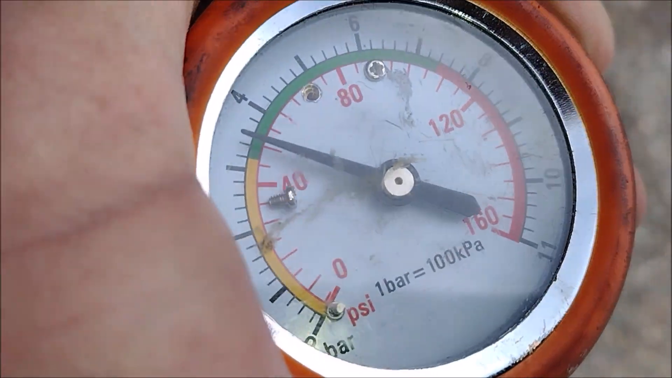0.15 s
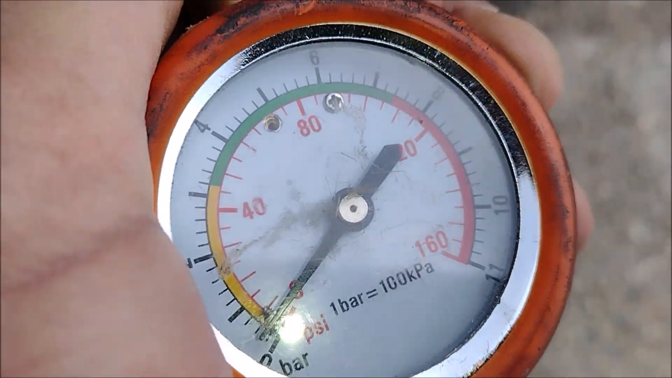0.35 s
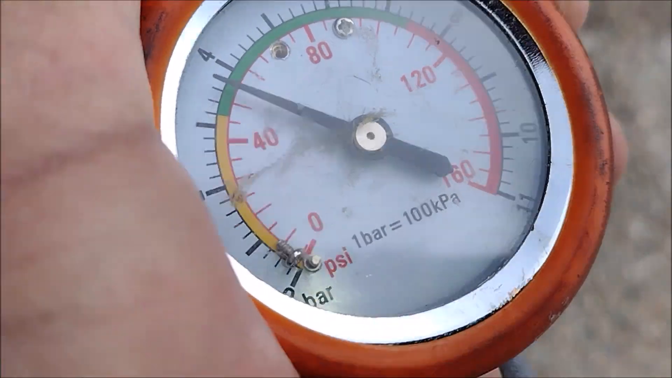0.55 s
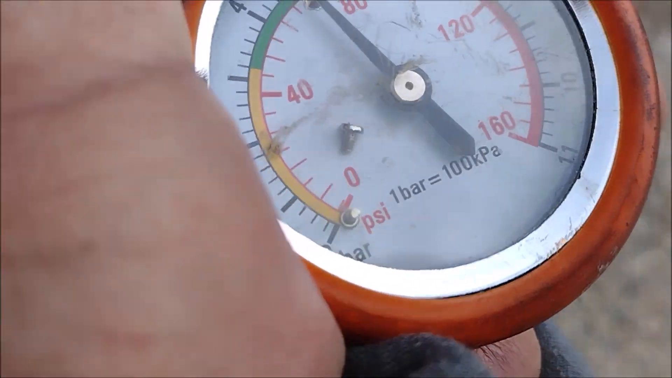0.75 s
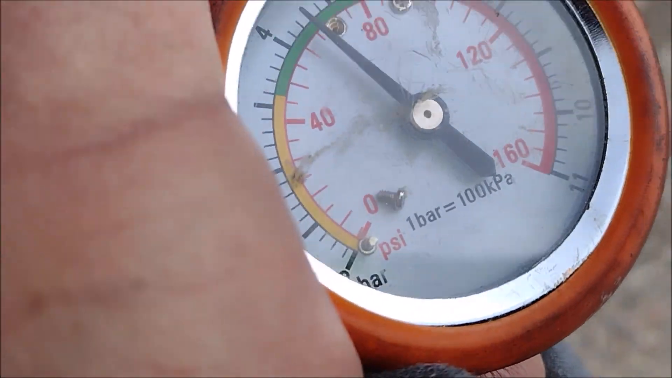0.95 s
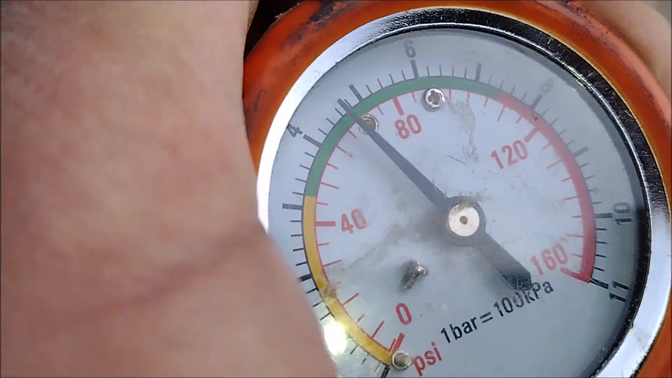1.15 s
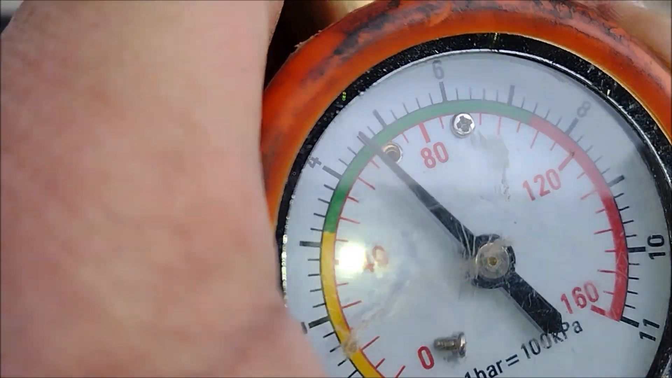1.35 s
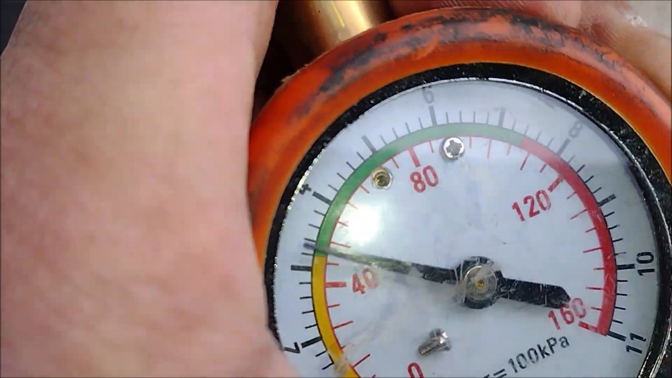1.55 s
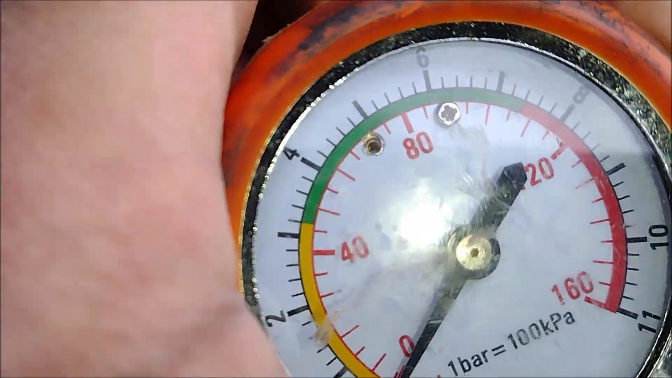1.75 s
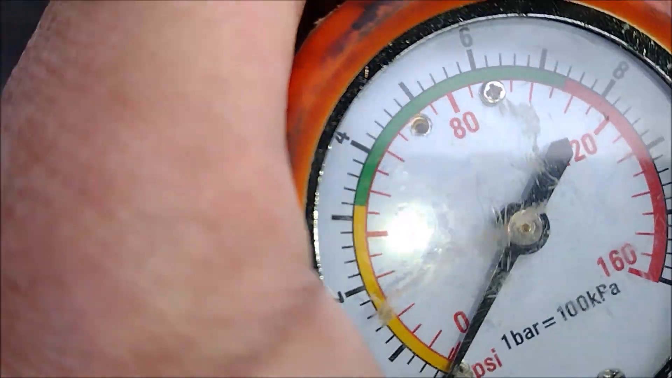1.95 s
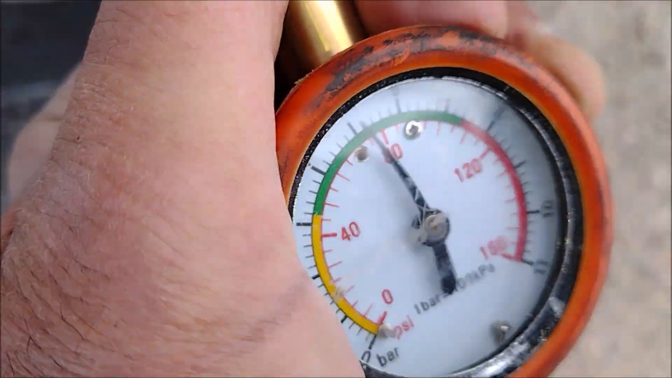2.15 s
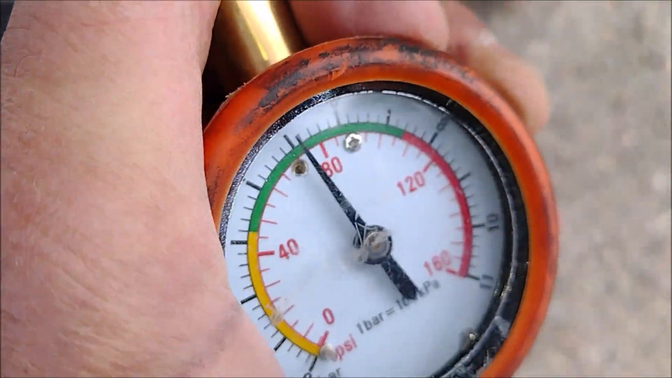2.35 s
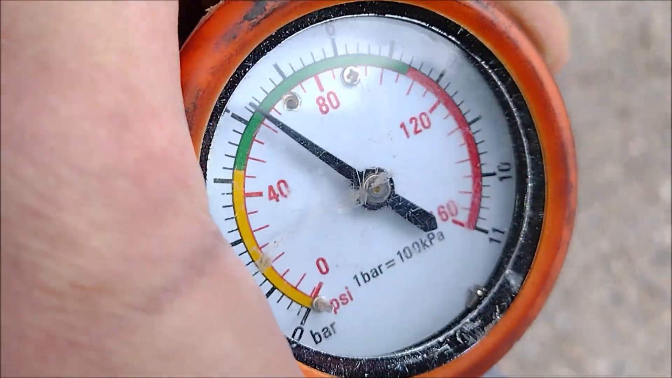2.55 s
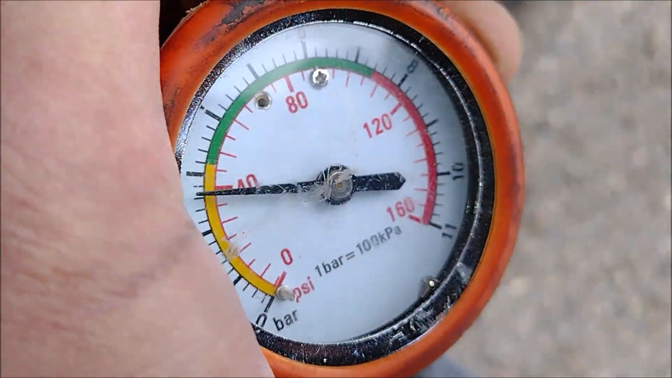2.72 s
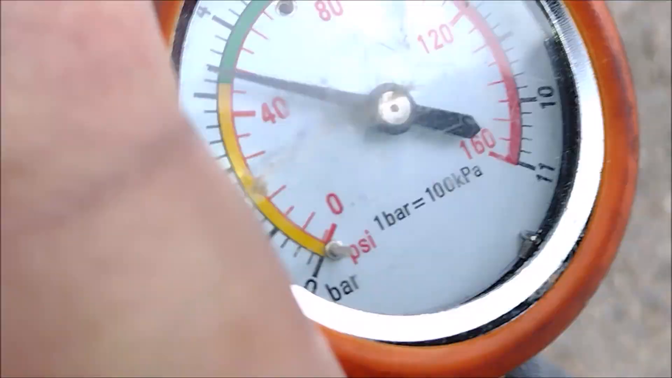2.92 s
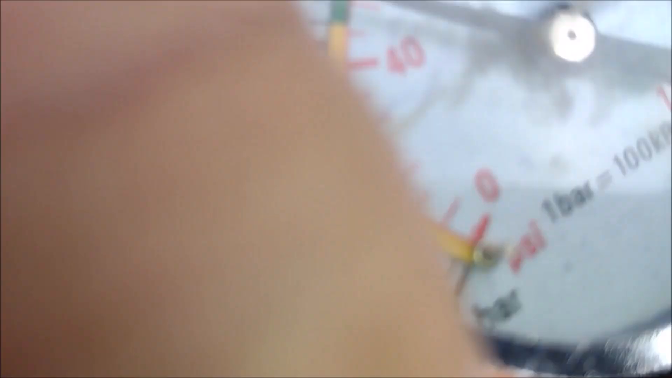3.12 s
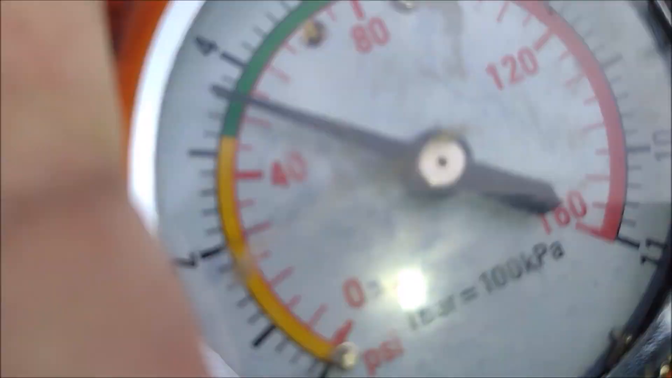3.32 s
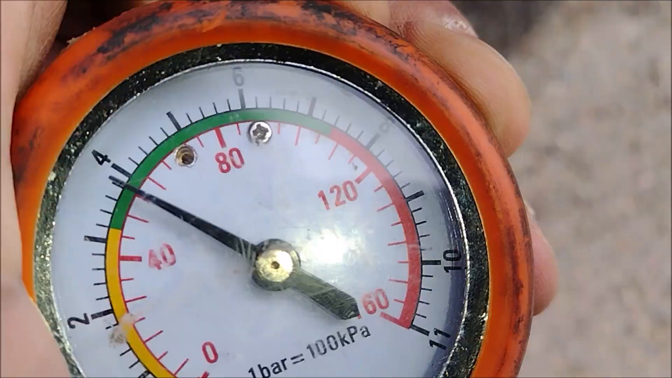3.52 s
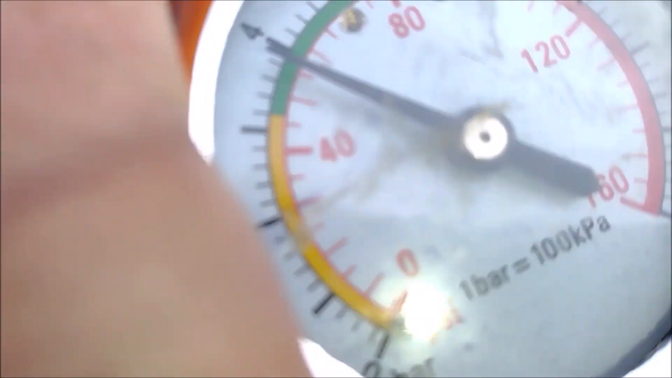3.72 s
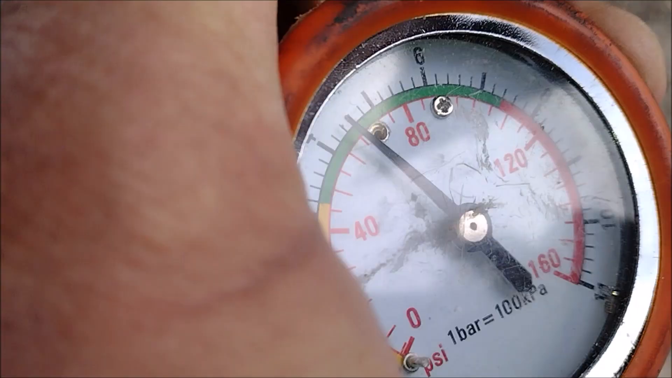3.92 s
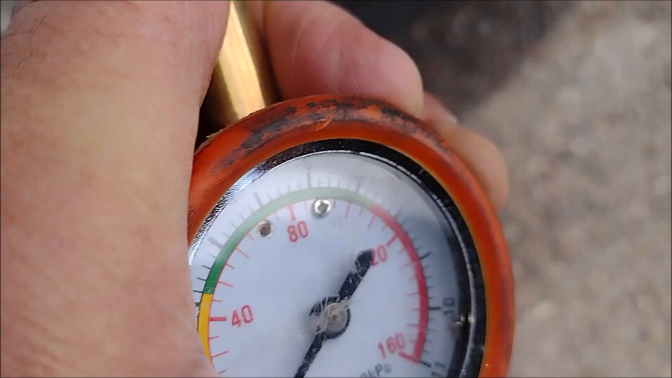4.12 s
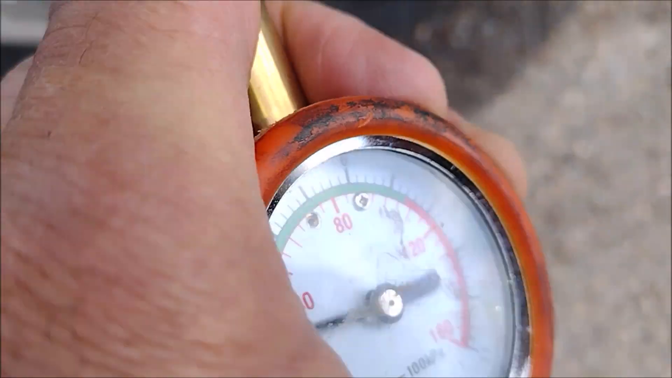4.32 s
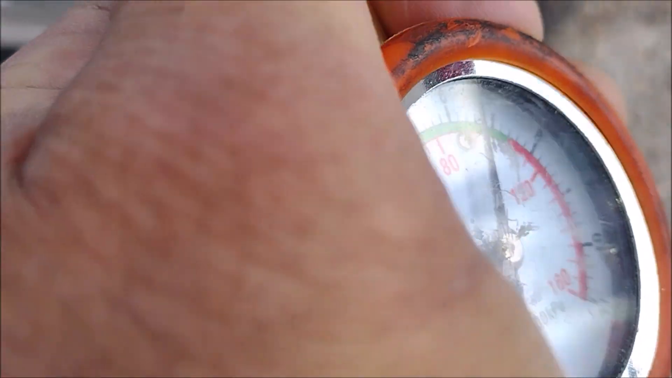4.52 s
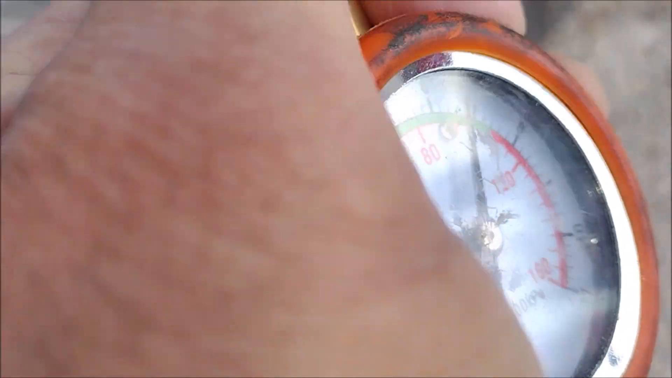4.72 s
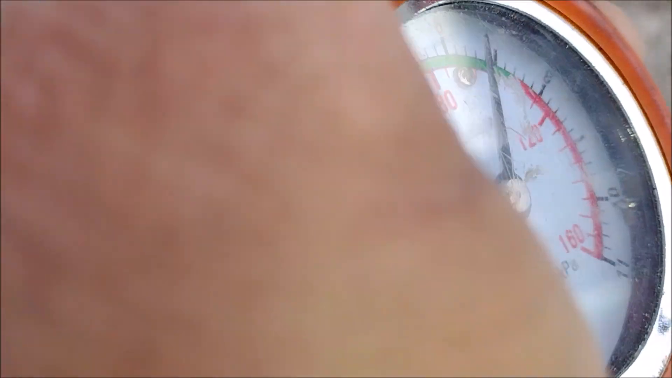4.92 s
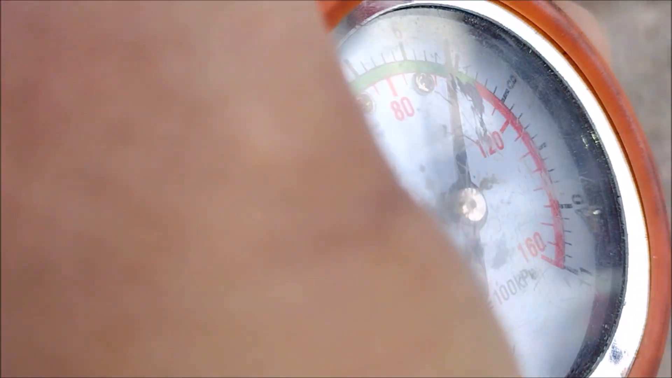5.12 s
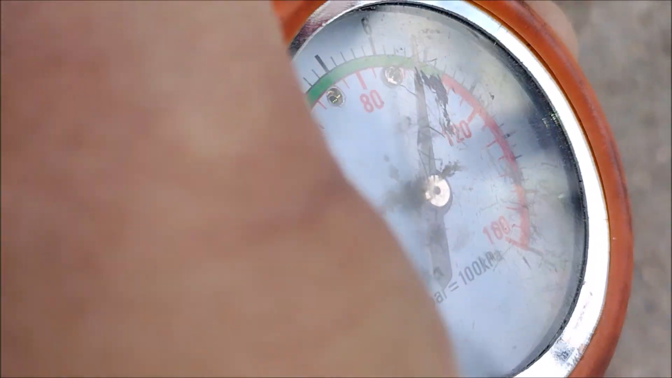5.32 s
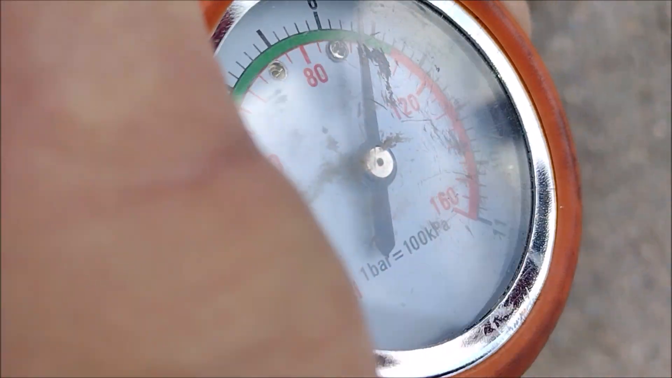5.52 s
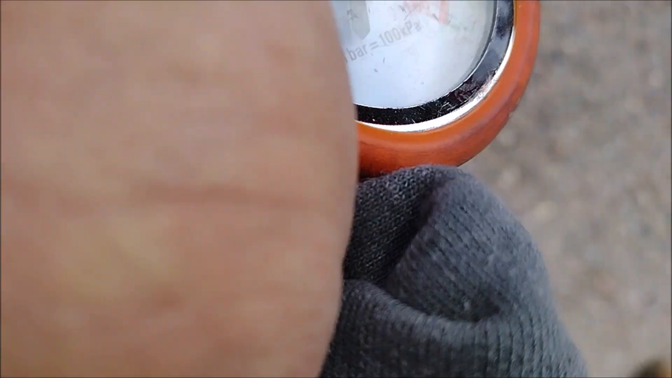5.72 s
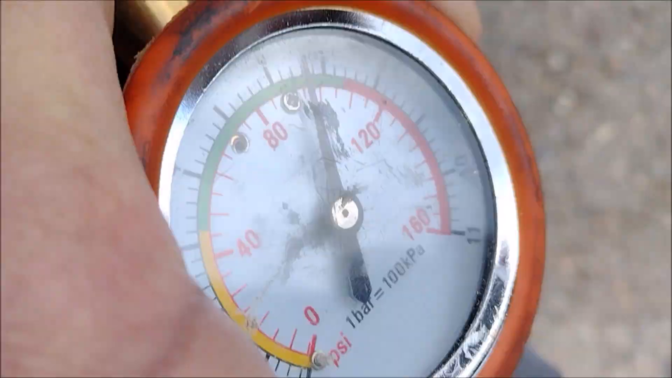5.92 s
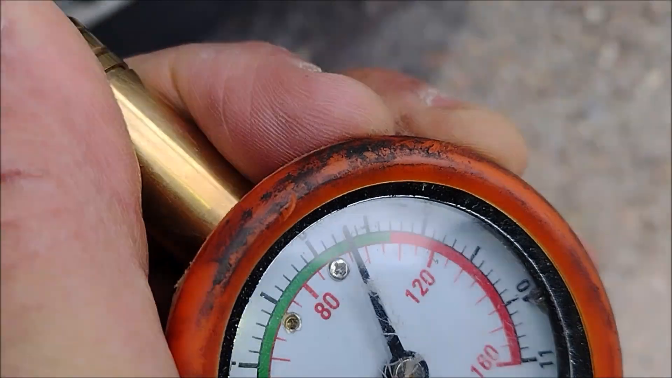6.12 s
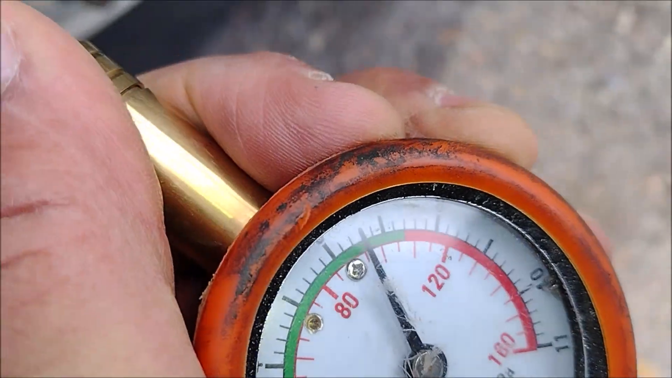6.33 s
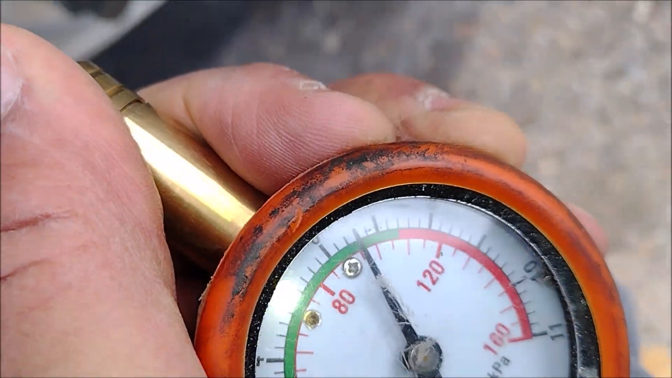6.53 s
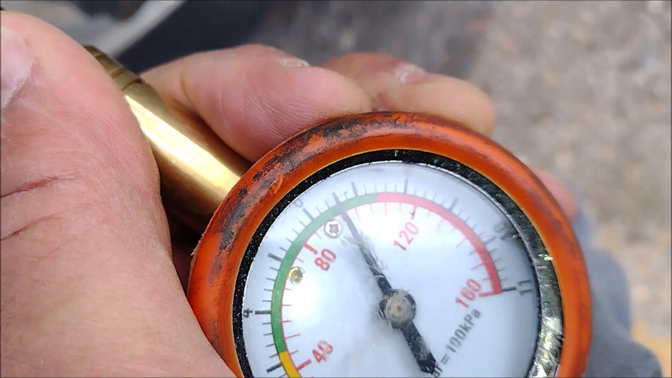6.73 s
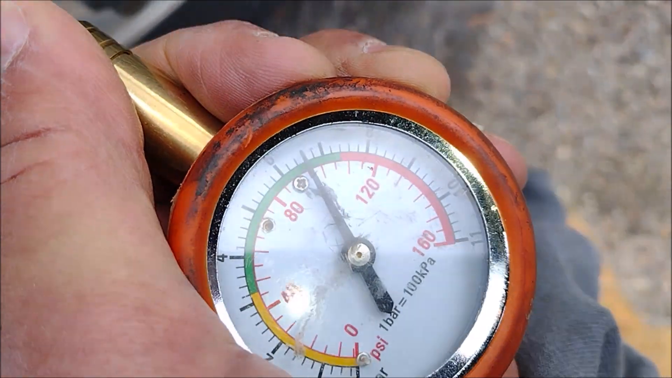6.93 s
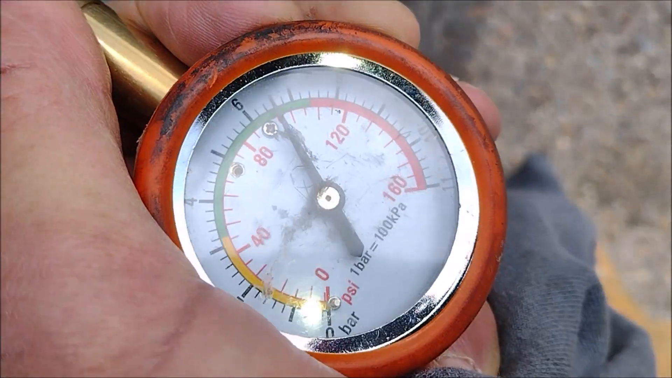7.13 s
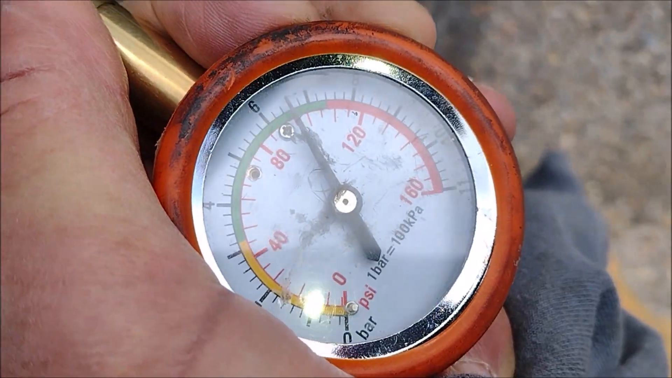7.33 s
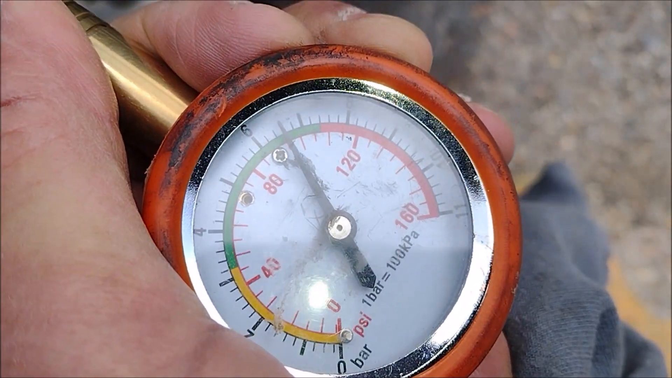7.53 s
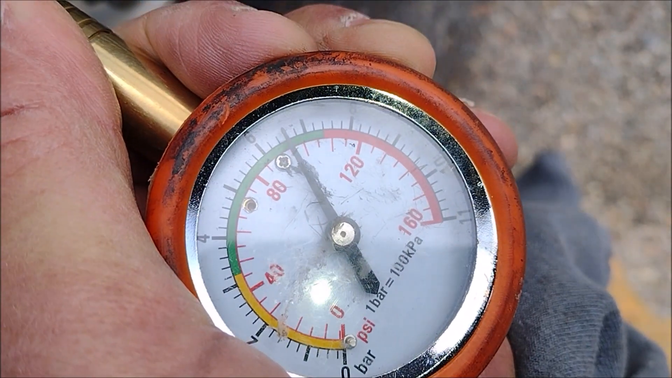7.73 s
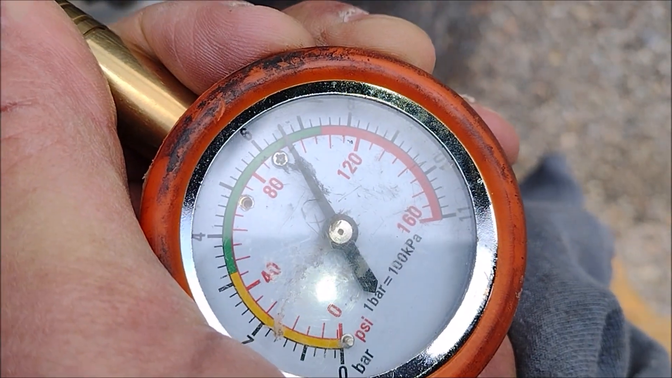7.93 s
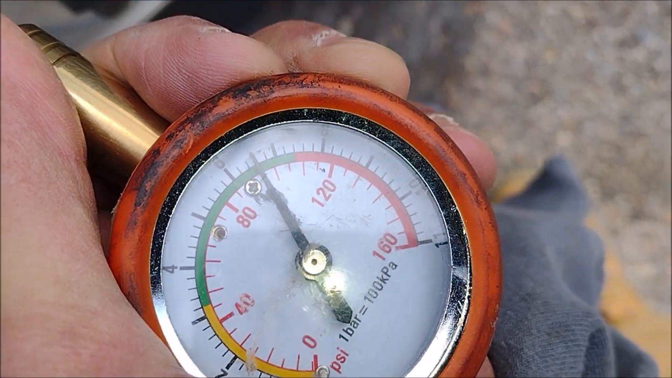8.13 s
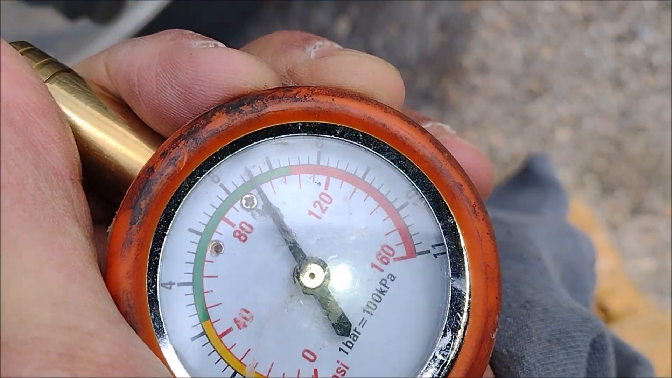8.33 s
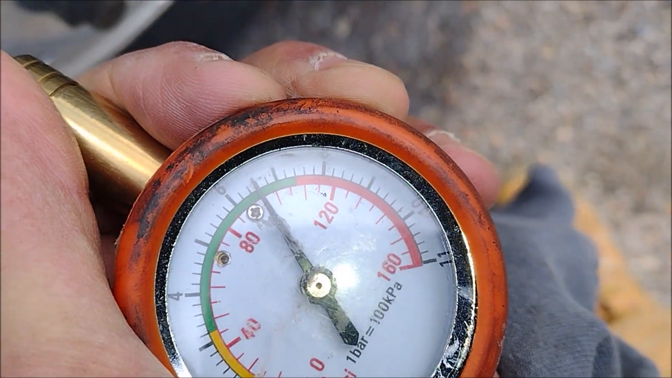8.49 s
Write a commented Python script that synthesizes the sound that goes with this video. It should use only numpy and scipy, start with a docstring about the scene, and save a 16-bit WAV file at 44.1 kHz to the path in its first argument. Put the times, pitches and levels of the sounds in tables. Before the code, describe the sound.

Outdoors and very close to the microphone, compressed air escapes from a loose chuck held on a large tyre valve. Four roaring bursts start suddenly and cut off sharply, separated by short pauses with wind rumble and a small metallic tick. The longest burst carries a faint airy whistle and brief dips. Then the chuck seats and only a thin, bright, much quieter hiss continues, over a faint yard murmur.

```python
"""Compressed air roars in four bursts past a loose chuck held on a large tyre valve, close to a two-port microphone.
The jet is wide stereo noise, gated, shaded band by band and joined by a whistle near 2 kHz.
Then the chuck seats, and a thin hiss of noise with gliding echoes fills the tyre.
Struck modes make the metal ticks, and a short band of noise the rustle of the hand.
Low lumpy noise is wind on the ports, and a smooth coloured noise is the yard behind."""
import sys
import numpy as np
from scipy import signal
from scipy.fft import rfft, irfft, next_fast_len
from scipy.io import wavfile
from scipy.ndimage import map_coordinates

SR = 44100
rng = np.random.default_rng(int(sys.argv[2]) if len(sys.argv) > 2 else 0)


def pcm_store(signal):
    """Save signal as 16-bit PCM."""
    levels = np.round(np.clip(np.atleast_2d(signal), -1, 1) * 32767)
    wavfile.write(sys.argv[1], SR, levels.astype(np.int16).T)


def attenuation_scalar(level_db):
    """Turn a level in dB into a linear amplitude multiplier (20 dB per decade)."""
    decades = np.asarray(level_db, float) / 20
    return 10 ** decades


N = 377496   # length in samples
PORT_LAG_S = 0.000284   # the right port hears the valve later
SEATED_S = 4.47   # the chuck starts to seat

# The jet while it blows. Each row: time in seconds, level in dB, roar under 1.2 kHz in dB,
# 2 kHz rush in dB; roar and rush are weighted from band to band.
JET = [(0, -20.5, 2, 1.5), (.05, -15.5, 5, -0.5), (.16, -16.5, -3.5, -4.5), (.385, -17, -0.5, -4),
       (.7, -20, 2.5, 1.5), (1.05, -17, 0, -1), (1.7, -17.5, 1.5, 0), (2.15, -17, -3, 6),
       (2.42, -16, -1.5, 2), (2.6, -16.5, 0.5, 0.5), (3.09, -14.5, -0.4, 1.5), (3.2, -13.5, -4, -7.5),
       (3.45, -16, -3.5, -5), (3.66, -17.5, 1, 5), (3.8, -19, 2.5, 1.5), (3.86, -18, -1, -6.5),
       (3.96, -18.5, -1, -3.5), (4.08, -17.5, -2, 6.5), (4.19, -18.5, 0.5, -3.5), (4.45, -19.5, -2, 2.5)]
# Bursts of the loose chuck. Each row: opening in seconds, shutting in seconds,
# slowness of the opening, slowness of the shutting (factors on the times of the next two tables).
BURSTS = [(-.3, 0.382, 1.01, 0.86), (0.599, 1.696, 0.9, 0.91), (2.131, 4.229, 1.08, 1.45),
          (4.375, 4.483, 0.61, 1.3)]
# Every opening creeps in, snaps, then swells, roar first.
# Each row: time from the opening in seconds (before slowness), level in dB, roar in dB.
OPENING = [(-.07, -77, 10), (-.035, -42, 6), (-.012, -22.5, -2), (-.004, -14.5, 5), (0, -5, 9.5),
           (.03, -2.5, 3), (.15, 0, 0)]
# Every shutting drops at once and leaves a dull tail.
# Each row: time from the shutting in seconds (before slowness), level in dB, low bands in dB.
SHUTTING = [(0, 0, 0), (.018, -12.5, 3.5), (.045, -43.5, 5.5), (.13, -49, 12), (.33, -59.5, 6)]
# The jet surges briefly, sometimes just before it half seals or shuts.
# Each row: peak in seconds, lift in dB, rise in seconds.
SURGES = [(2.237, 3, 0.082), (3.622, 2.5, 0.01), (3.79, 3, 0.024), (4.003, 5.5, 0.033), (4.222, 9, 0.038),
          (4.459, 8, 0.081)]
# The chuck half seals for a moment. Each row: time in seconds, level change in dB,
# further change of the low bands in dB (before each band's share), length in seconds.
SEALS = [(2.249, -6, -8.5, .15), (3.14, -6, 2, 0.085), (3.734, -6, -5.5, 0.055)]
# Colour of the jet. Each row: frequency in Hz, left in dB per Hz, right in dB per Hz, all relative.
ESCAPE_COLOUR = [(296, -30.5, -8.5), (413, -10.5, -12), (477, -5, -0.75), (820, -9.5, -3.5),
                 (1290, -6, -0.5), (2080, -13, -1.5), (2670, -8, -5.5), (4270, -9, -6.5),
                 (5600, -7.5, -4.5), (8040, -5.5, -4.5), (8610, -12, -15.5), (9980, -16, -20.5),
                 (13300, -11, -20), (17500, -10.5, -19.5)]
# Jet noise shared by the ports. Each row: frequency in Hz, common share of the power from 0 to 1.
ESCAPE_LIKENESS = [(500, 0.97), (1500, 0.79), (3500, 0.58), (7000, 0.36), (9000, 0.13)]
# Chuck, hose and port resonances. Each row: centre in Hz, width in Hz, left gain in dB, right gain in dB.
PIPE = [(528, 47, 5, 3.5), (670, 31, 6.5, 5), (948, 28, 9.5, 3), (1458, 24, -15, 4),
        (1805, 190, -0.5, -2.5), (2190, 250, 2, 2), (3720, 67, 1.2, 0), (4430, 240, 3.5, 3.5),
        (15300, 1200, 5.5, 7.5)]
# Whistle in the jet. Each row: time in seconds, level against the jet in dB at the right port.
WHISTLE = [(1.1, -28), (1.4, -16), (2.35, -16), (2.45, -8), (3.1, -7), (3.2, -22), (3.65, -14)]
# Stream of the seated chuck. Each row: time in seconds, level in dB, level around 11 kHz in dB,
# level above 14 kHz in dB (before each port's share), left minus right in dB.
FILL = [(4.5, -23.5, 5, 4, -1), (4.55, -25, 7, 7.5, -4.5), (4.6, -21.5, 8, 1.5, 2.5),
        (4.67, -27, 10.5, 1.5, 1.5), (4.8, -24.5, 10, -2, 7), (5.2, -29.5, 7, -3, 5),
        (5.45, -30.5, 2.5, -11, 11), (5.88, -35.5, -0.5, -6, 9), (6.1, -29.5, -5, 3.5, 12.5),
        (6.45, -29, -10, 5.5, 19), (7.05, -35.5, -3, 8, 20), (7.4, -30, -5.5, 5.5, 19.5),
        (8, -27.5, -8.5, 5.5, 18), (8.56, -27.5, -6.5, 6, 18)]
# The 4 kHz leak fades as the seal settles. Each row: time in seconds, level in dB.
LEAK = [(4.47, 12), (5.5, 11.5), (6.5, 2.5), (7.5, -5.5)]
# The seated stream spits. Each row: peak in seconds, lift in dB.
SPITS = [(4.858, 3.8), (4.89, 6.4), (4.916, 5)]
# Colour of the seated stream. Each row: frequency in Hz, left in dB per Hz, right in dB per Hz, all relative.
FILL_COLOUR = [(1515, -31, -28), (2450, -18.5, -30), (2980, -6.5, -19), (3670, -21.5, -26.5),
               (5200, -24, -20.5), (6050, -8, -23.5), (6570, 0.5, -8), (7860, 3.5, -16.5),
               (8930, -9, -18.5), (10200, -5.5, -34), (12100, -4.5, -37.5), (14000, -6.5, -26),
               (15950, -6.5, -24.5)]
# Stream noise shared by the ports. Each row: frequency in Hz, common share of the power from 0 to 1.
FILL_LIKENESS = [(1500, 0.37), (2800, 0.24), (4500, 0.21), (6500, 0.26), (12000, 0.43), (15000, 0.3)]
# Echoes off rim and hand, for the left then the right port, the first grip then the second.
# Each row: delay in milliseconds (before the left port's stretch), signed gain.
RIM_ECHOES = [
    [[(.807, -.17), (.953, .28), (1.189, .17), (1.325, -.16)], [(.923, -.23), (1.055, .12), (1.167, -.22),
     (1.347, -.12)]],
    [[(.638, -.14), (1.332, .18), (2.931, -.1)], [(1.385, .11), (1.554, .27), (1.982, -.13), (2.161, -.15)]],
]
# Hand movement. Each row: time in seconds, stretch of the left echo paths in the first grip, in the second.
HAND = [(4.93, 1, 1.07), (5.2, 1.032, 1.07), (5.85, 1.015, 1.068), (6.27, 1.015, 1.005), (6.6, 1.015, .988),
        (7.05, 1.015, .987), (7.25, 1.015, 1.003)]
# Metal chuck touching the valve. Each row: time in seconds, strength in dB before the mode levels.
TICKS = [(1.7724, -47.5), (1.82, -33.5)]
# Ringing modes of the chuck. Each row: frequency in Hz, relative level in dB, decay by 60 dB in seconds.
CHUCK = [(2955, -7.5, 0.22), (4910, -5, 0.012), (7784, -7, .03), (13400, -6, .02)]
# The hand shifts on the hose. The one row: peak in seconds, level in dB, half length in seconds.
RUSTLE = (1.998, -46, .035)
# Wind gusts. Each row: peak in seconds, peak level in dB, left minus right in dB, level around 250 Hz in dB.
GUSTS = [(.24, -28.5, -18.5, -2), (.51, -28, 11.5, 1.5), (1.17, -34, -16.5, -2), (2.07, -25, 1, -5),
         (2.16, -26, -16, -3.5), (3.45, -39, 4, 9), (4.06, -31, -5, -1), (4.3, -32.5, -20, -5.5)]
# Slowly changing draught between the gusts. Each row: time in seconds, level in dB.
BREEZE = [(0, -42.5), (1.5, -41), (1.95, -31.5), (2.5, -39), (3.3, -33), (4.4, -36.5), (5.0, -43),
          (5.8, -47.5), (7.1, -49.5), (8.56, -47)]
# Colour of the wind. Each row: frequency in Hz, left in dB per Hz, right in dB per Hz, all relative.
GUST_COLOUR = [(23.1, -30, -37), (50, -11, -13.5), (75.5, -6, 0), (108, 1, 2.5), (161, -2, -5.5),
               (228.6, -5, -6), (306, -14.5, -17), (444, -21.5, -23), (696, -60, -66.5), (2800, -87.5, -85)]
# Murmur of the yard. Each row: time in seconds, level in dB.
YARD = [(0, -49), (.5, -53), (1.9, -51.5), (4.3, -47.5), (6, -56), (7.3, -61.5), (8.56, -56)]
# Colour of the yard. Each row: frequency in Hz, left in dB per Hz, right in dB per Hz, all relative.
YARD_COLOUR = [(340, -26, -14.5), (480, -20, -20.5), (597, -15.5, -12), (730, -19, -19.5),
               (1340, -24.5, -23.5), (2000, -30, -21.5), (2820, -38.5, -28), (3500, -44, -37),
               (8100, -49, -56), (15700, -56, -58)]


def escape():
    """A wide jet in bursts; a larger gap lifts the roar and rush, while the top stays nearly steady."""
    level_db, roar_db, rush_db = in_time(JET)
    gate_db, gate_roar_db, gate_rush_db = valve()
    surge_db = sum(db * tent(s, rise_s, 0.018) for s, db, rise_s in SURGES)
    seal_db, seal_low_db = sealing()
    level_db = level_db + gate_db + surge_db + seal_db
    roar_db = roar_db + gate_roar_db + 0.81 * seal_low_db
    rush_db = rush_db + gate_rush_db + 0.51 * surge_db
    # above a knee of -22.5 dB the top ignores 99 % of the jet's swings
    top_db = -0.99 * (np.maximum(level_db, -22.5) + 17.5)
    shading = [(500, roar_db),
               (820, roar_db + 0.2 * rush_db),
               (1500, 0.44 * roar_db + 0.92 * rush_db + seal_low_db),
               (2300, 0.88 * rush_db + 1.24 * seal_low_db),
               (3200, 0.67 * rush_db + 0.2 * seal_low_db),
               (6000, 0.002),
               (11000, top_db)]
    jet = turbulence(ESCAPE_COLOUR, ESCAPE_LIKENESS, PORT_LAG_S, 0.93, 15.3, shading, pipe_ring, count=13)
    return attenuation_scalar(level_db) * (jet + whistle())


def valve():
    """The gap's level, roar and low-band dB, taken from the loudest burst at each moment."""
    bursts = []
    for on, off, slow_on, slow_off in BURSTS:
        opening = np.multiply(OPENING, [slow_on, 1, 1]) + [on, 0, 0]
        shutting = np.multiply(SHUTTING, [slow_off, 1, 1]) + [off, 0, 0]
        bursts.append([*in_time(opening), *in_time(shutting)])
    bursts = np.array(bursts)
    loudest = np.argmax(bursts[:, 0] + bursts[:, 2], axis=0)
    open_db, roar_db, shut_db, low_db = np.take_along_axis(bursts, loudest[None, None], axis=0)[0]
    return open_db + shut_db, roar_db + low_db, low_db


def sealing():
    """Level change while the chuck half seals, and the longer change of the low bands."""
    t, fall_s, hold_share = np.arange(N) / SR, 0.012, 0.64
    level_db, low_db = np.zeros(N), np.zeros(N)
    for s, db, further_db, length_s in SEALS:
        level_db += db * tent(s, fall_s, length_s)
        corners = [s - fall_s, s, s + hold_share * length_s, s + length_s]
        low_db += np.interp(t, corners, [0, further_db, further_db, 0])
    return level_db, low_db


def pipe_ring(hz):
    """Resonances raise or lower the noise around their centres, differently at each port."""
    gain_db = 0
    for centre, width, left_db, right_db in PIPE:
        peak = 1 / (1 + ((hz - centre) / (width / 2)) ** 2)
        gain_db = gain_db + np.array([[left_db], [right_db]]) * peak
    return attenuation_scalar(gain_db)


def whistle():
    """Noise twice through one narrow resonance, louder and later at the right port."""
    centre_hz, width_hz, left_db = 1955, 100, -10
    r = np.exp(-np.pi * width_hz / SR)
    poles = [1, -2 * r * np.cos(2 * np.pi * centre_hz / SR), r * r]
    tone = rng.standard_normal(N)
    for _ in range(2):
        tone = signal.lfilter([1, 0, -1], poles, tone)
    tone = rms_one(tone) * attenuation_scalar(in_time(WHISTLE)[0])
    return np.array([attenuation_scalar(left_db) * tone, np.roll(tone, round(PORT_LAG_S * SR))])


def fill():
    """A narrow stream into the tyre; its colour table holds where the left is 13 dB louder."""
    seating_s, colour_pan_db, spit_s = 0.03, 13, 0.0015
    level_db, top_db, edge_db, pan_db = in_time(FILL)
    leak_db = in_time(LEAK)[0]
    level_db = level_db + sum(db * tent(s, spit_s, spit_s) for s, db in SPITS)
    # how far the left and right ports follow the swings of the treble
    top_db = np.outer([1, 1], top_db)
    edge_db = np.outer([1, 0.13], edge_db)
    shading = [(2000, 0.68 * leak_db), (3000, 0.7 * leak_db), (4400, leak_db), (7000, 0),
               (11600, top_db), (15500, edge_db)]
    stream = turbulence(FILL_COLOUR, FILL_LIKENESS, 1.205 * PORT_LAG_S, 0.65, 13, shading, count=9)
    stream = rim_comb(stream)
    stream[1] *= attenuation_scalar(colour_pan_db - pan_db)
    seated = np.clip((np.arange(N) / SR - SEATED_S) / seating_s, 0, 1)
    return attenuation_scalar(level_db) * seated * stream / np.sqrt(1 + attenuation_scalar(-2 * pan_db))


def rim_comb(x):
    """Short echoes ripple the spectrum; at the left they glide as the hand moves, at both they change with its grip."""
    regrip_s, regrip_length_s = (5.6, 6.5), 0.3   # the second grip takes over, left and right
    fine = 4   # oversampling for fractional delays
    t, out = np.arange(N) / SR, x.copy()
    # small surfaces return only treble
    treble = signal.sosfiltfilt(signal.butter(2, 3500, "high", fs=SR, output="sos"), x)
    for port, grips in enumerate(RIM_ECHOES):
        dense = signal.resample_poly(treble[port], fine, 1)
        second = np.clip((t - regrip_s[port]) / regrip_length_s + 0.5, 0, 1)
        for echoes, share, stretch in zip(grips, (1 - second, second), in_time(HAND)):
            on = (share > 0) & (t > SEATED_S)
            path = stretch[on] if port == 0 else 1   # only the left paths stretch
            for ms, gain in echoes:
                at = (t[on] - path * ms / 1000) * SR * fine
                out[port, on] += gain * share[on] * map_coordinates(dense, [at], order=1)
    return out


def ticks():
    """Each touch of metal strikes the chuck's decaying modes with strengths of its own."""
    seconds, strength_db = np.transpose(TICKS)
    at, out = np.round(seconds * SR).astype(int), np.zeros(N)
    for hz, level_db, t60 in CHUCK:
        clicks = np.full(N, 1e-18)   # a trace of input keeps the filter out of tiny numbers
        clicks[at] = attenuation_scalar(strength_db + level_db - 6.5 + rng.normal(0, 1.9, len(at)))
        r, w = attenuation_scalar(-60 / (t60 * SR)), 2 * np.pi * hz / SR
        out += signal.lfilter([0, np.sin(w)], [1, -2 * r * np.cos(w), r * r], clicks)
    return out


def rustle():
    """A short dull brush of skin on rubber: band-passed noise that swells and fades."""
    s, db, half_s = RUSTLE
    band = signal.butter(2, [400, 1300], "band", fs=SR, output="sos")
    brush = signal.sosfilt(band, rng.standard_normal((2, N)))
    return attenuation_scalar(db) * tent(s, half_s, half_s) * rms_one(brush)


def gusts():
    """Lumpy low pressure on the ports, partly each port's own; it slackens at deep half seals."""
    rise_db_per_s, fall_db_per_s = 114.5, 111
    breeze_pan_db, breeze_upper_db = -1, -0.5   # left minus right; level around 250 Hz
    t, side = np.arange(N) / SR, np.array([[0.5], [-0.5]])
    power = attenuation_scalar(in_time(BREEZE)[0] + breeze_pan_db * side) ** 2
    upper = breeze_upper_db * power.sum(axis=0)
    for s, db, pan_db, upper_db in GUSTS:
        away_db = np.where(t < s, rise_db_per_s * (s - t), fall_db_per_s * (t - s))
        gust = attenuation_scalar(db - away_db + pan_db * side) ** 2
        power = power + gust
        upper = upper + upper_db * gust.sum(axis=0)
    # the upper band is the average over draught and gusts, weighted by power
    shading = [(100, 0.0081), (250, upper / power.sum(axis=0))]
    lumps = turbulence(GUST_COLOUR, [(60, 0.26), (250, 0.49)], 0, 2.7, 18.6, shading, count=9)
    return np.sqrt(power) * attenuation_scalar(1.5 * sealing()[1]) * lumps


def yard():
    """Far machinery and traffic as a smooth murmur of coloured noise."""
    murmur = turbulence(YARD_COLOUR, [(400, 0.31), (3000, 0.33)], PORT_LAG_S, 0.12, 25)
    return attenuation_scalar(in_time(YARD)[0]) * murmur


def turbulence(colour, likeness, lag_s, patchy_db, patch_rate, shading=(), ring=None, count=6):
    """Coloured stereo noise, mid rms 1 before its bands flicker and follow shading [(Hz, dB in time)]."""
    size = next_fast_len(N)
    hz = np.maximum(np.arange(size // 2 + 1) * SR / size, 1)
    common, left, right = rfft(rng.standard_normal((3, size)))
    alike = np.clip(at_hz(likeness, hz)[0], 0, 1)
    late = np.exp(-2j * np.pi * hz * lag_s)
    shared = np.sqrt(alike) * np.array([common, common * late])
    pair = shared + np.sqrt(1 - alike) * np.array([left, right])
    pair = pair * attenuation_scalar(at_hz(colour, hz))
    pair = pair * np.minimum(hz / colour[0][0], 1) ** 4   # fade below the lowest colour point
    if ring is not None:
        pair = pair * ring(hz)
    pair = pair / np.std(irfft(pair.mean(axis=0), size))

    centres = np.geomspace(colour[0][0], colour[-1][0], count)
    shade_hz = [f for f, _ in shading]
    out, together = 0, drift(patch_rate)
    for k, centre in enumerate(centres):
        # overlapping triangular bands on a log-frequency axis
        share = np.interp(np.log(hz), np.log(centres), np.arange(count) == k)
        db = patchy_db * (0.76 * together + drift(patch_rate))
        for i, (_, shade_db) in enumerate(shading):
            weight = np.interp(np.log(centre), np.log(shade_hz), np.arange(len(shading)) == i)
            db = db + shade_db * weight
        out = out + attenuation_scalar(db) * irfft(pair * share, size)[:, :N]
    return out


def drift(rate):
    """Slow chance of spread 1: coarse noise through a double one-pole low-pass at rate Hz."""
    coarse = 40   # samples per coarse step
    r = np.exp(-2 * np.pi * coarse * rate / SR)
    noise = rng.standard_normal(N // coarse + 2002)
    slow = signal.lfilter([1], [1, -2 * r, r * r], noise)[2000:]   # skip the filter's start
    return np.interp(np.arange(N) / coarse, np.arange(len(slow)), rms_one(slow))


def tent(peak_s, rise_s, fall_s):
    """Straight rise to 1 at the peak, straight fall after it."""
    return np.interp(np.arange(N) / SR, [peak_s - rise_s, peak_s, peak_s + fall_s], [0, 1, 0])


def in_time(rows):
    """Columns of a curve table, one value per sample."""
    s, *columns = np.transpose(rows)
    return [np.interp(np.arange(N) / SR, s, c) for c in columns]


def at_hz(points, hz):
    """Columns of a spectrum table read on a log-frequency axis."""
    f, *columns = np.transpose(points)
    return np.array([np.interp(np.log(hz), np.log(f), c) for c in columns])


def rms_one(x):
    """Scale to an rms of 1."""
    return x / np.sqrt(np.mean(x ** 2) + 1e-20)


def scene():
    """All sources at the two ports."""
    return escape() + fill() + ticks() + rustle() + gusts() + yard()


def band_limit(x):
    """A steep low-pass at the top of the band."""
    return signal.sosfilt(signal.butter(12, 16960, fs=SR, output="sos"), x)


def record(dry):
    """Peaks are rounded by soft saturation and the top is cut steeply at 15.9 kHz."""
    rounded = 1.097 * np.tanh(dry / 1.106)
    low_pass = signal.cheby2(30, 50, 15900, fs=SR, output="sos")
    mix = signal.sosfilt(low_pass, rounded)
    return band_limit(mix)


dry = scene()
out = record(dry)
pcm_store(out)
```